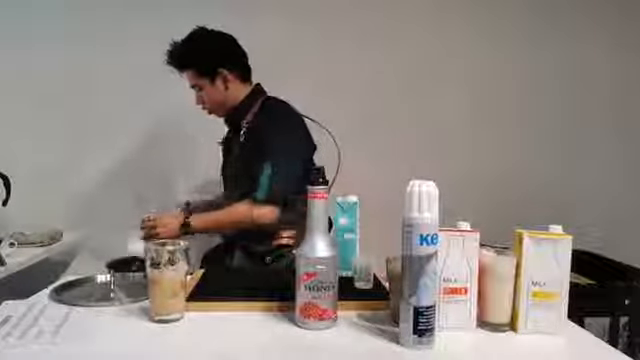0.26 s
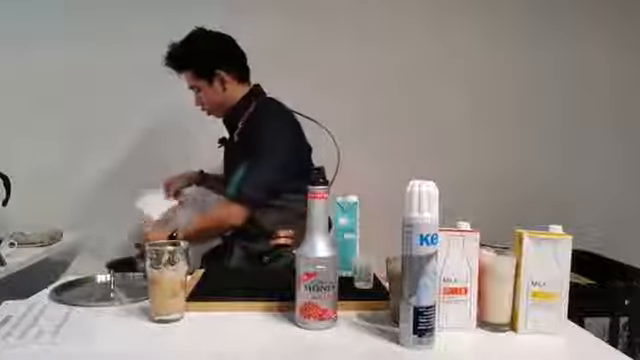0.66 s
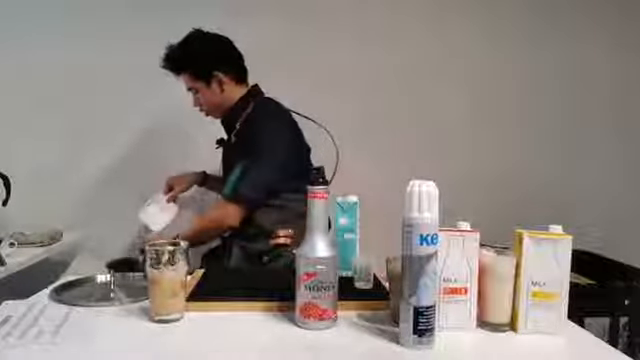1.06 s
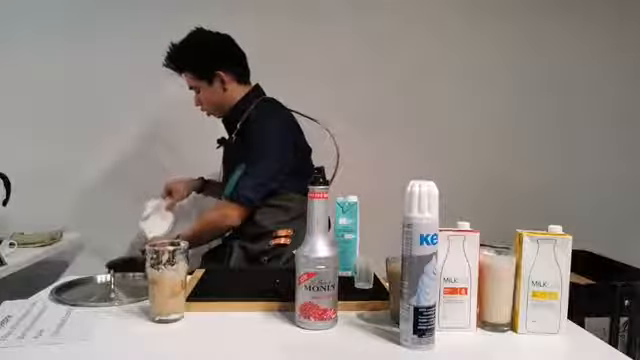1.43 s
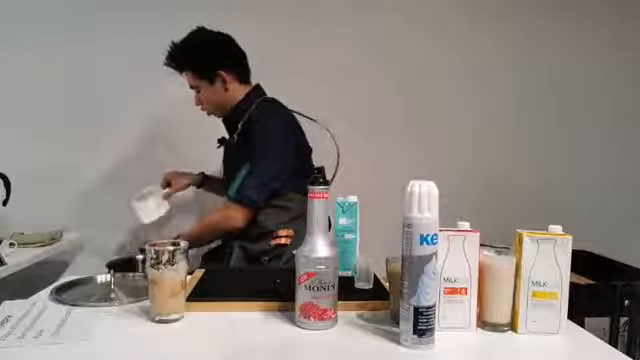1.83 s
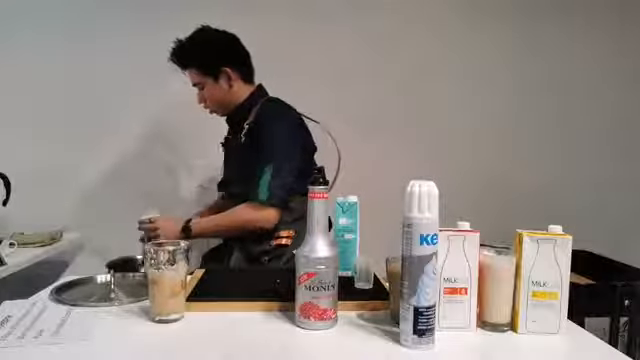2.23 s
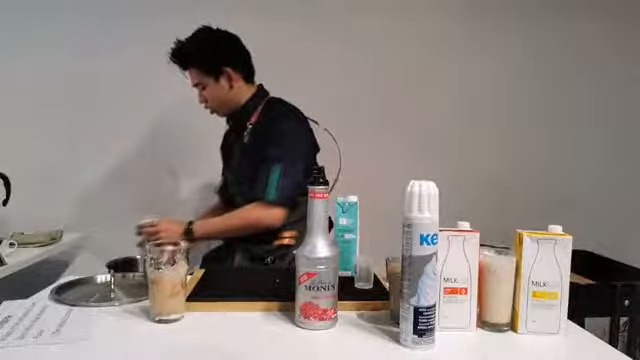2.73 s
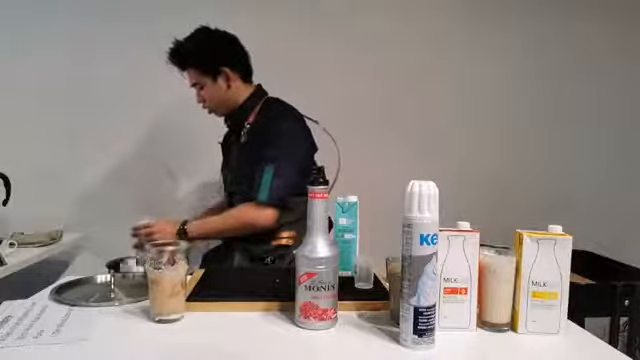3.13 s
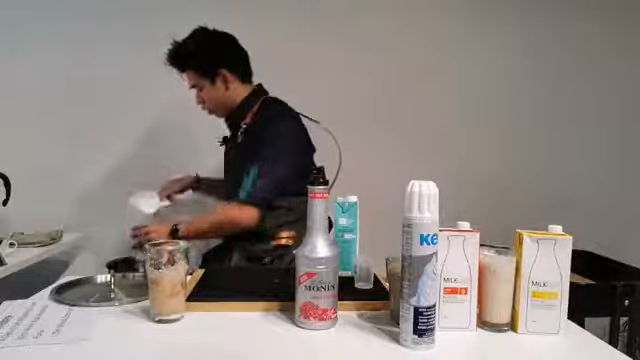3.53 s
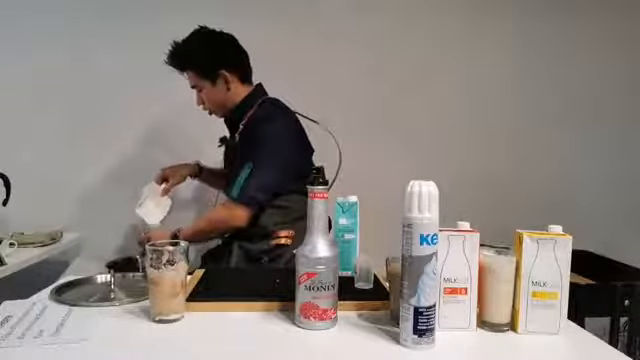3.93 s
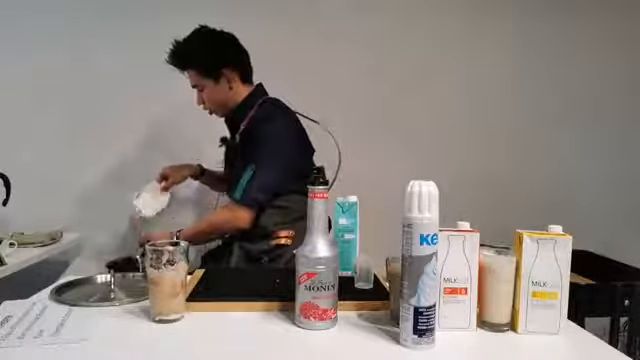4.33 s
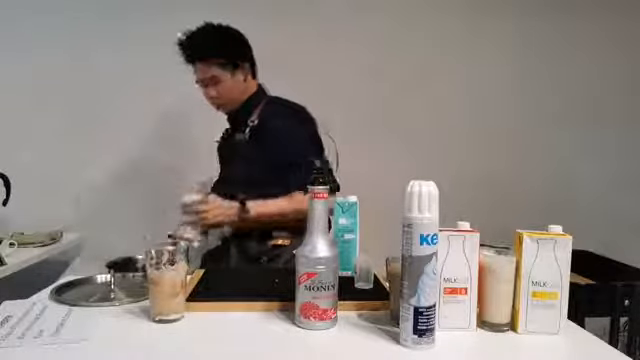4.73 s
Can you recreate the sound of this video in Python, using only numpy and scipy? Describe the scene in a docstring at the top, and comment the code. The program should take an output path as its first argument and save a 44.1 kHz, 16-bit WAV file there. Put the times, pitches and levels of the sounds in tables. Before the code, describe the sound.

A scoop digs twice through ice in a ringing metal container, each time dropping a few cubes into a glass with light clinks.

```python
"""Ice cubes grind and knock as a scoop digs them out of a metal bin, which rings.
Each knock is a crack, a hollow tone and a short bright clink. Cubes tipped into a glass
ring its wall, and metal struck free of the ice rings on. A bare room answers over a low
rumble, a wavering hum, one faint groan and a thin hiss."""
import sys
import numpy as np
from scipy import signal
from scipy.fft import rfft, irfft
from scipy.io import wavfile
from scipy.ndimage import uniform_filter1d

SR = 44100
rng = np.random.default_rng(int(sys.argv[2]) if len(sys.argv) > 2 else 0)


def store_pcm(level_fs):
    """Save levels as 16-bit WAV."""
    pcm = np.round(np.clip(level_fs, -1, 1) * 32767).astype(np.int16)
    wavfile.write(sys.argv[1], SR, np.atleast_2d(pcm).T)


N = 219390


def undb(db):
    return 10 ** (np.asarray(db) / 20)


def unit_rms(x):
    return x / np.sqrt(np.mean(x ** 2))


def band(x, lo_hz, hi_hz):
    return signal.sosfilt(signal.butter(3, [lo_hz, hi_hz], "bandpass", fs=SR, output="sos"), x)


def sine(hz, t):
    return np.sin(2 * np.pi * hz * t)


def mode(x, hz, t60_s):
    """One damped resonance; a unit impulse rings at size 1."""
    pole = np.exp(2j * np.pi * hz / SR - np.log(1000) / (t60_s * SR))
    return signal.lfilter([1], [1, -pole], x).imag


def colour(x, points, size=4096):
    """Minimum-phase filter through (Hz, dB) points."""
    hz, db = np.transpose(points)
    log_hz = np.log(np.fft.rfftfreq(size, 1 / SR) + 1)
    cepstrum = irfft(np.log(undb(np.interp(log_hz, np.log(hz), db))))
    cepstrum[1:size // 2] *= 2
    cepstrum[size // 2 + 1:] = 0
    return signal.fftconvolve(x, irfft(np.exp(rfft(cepstrum))))[:len(x)]


def envelope(points):
    """Gain through (s, dB) points, silent outside them."""
    times_s, db = np.transpose(points)
    return undb(np.interp(np.arange(N) / SR, times_s, db, left=-200, right=-200))


def wander(rate_hz):
    """Smooth random drift, spread near 1."""
    hold = int(SR / rate_hz)
    steps = np.repeat(rng.standard_normal(N // hold + 1), hold)
    return 1.3 * uniform_filter1d(uniform_filter1d(steps, hold), hold)[:N]


def spell(start_s, hold_s, attack_s=0.0058, settle_db_per_s=265):
    """Gain of one grinding spell: it swells, holds, and the cubes settle."""
    t = np.maximum(np.arange(N) / SR - start_s, 0)
    return (1 - np.exp(-t / attack_s)) * undb(-settle_db_per_s * np.maximum(t - hold_s, 0))


def tinkle(count=7000, lo_hz=600, hi_hz=9000, t60_s=0.026):
    """Small contacts each ring a cube at its own pitch."""
    when, pitch, size = rng.random((count, 3)).T[:, :, None]
    age = np.arange(SR // 60)
    pings = size * undb(-60 * age / SR / t60_s) * sine(lo_hz * (hi_hz / lo_hz) ** pitch, age / SR)
    at = (when * N).astype(int) + age
    return unit_rms(np.bincount(at.ravel(), pings.ravel(), N)[:N])


# Each row: start in seconds, hold in seconds, level in dB, extra treble in dB; band gains add to these.
GRIND_SPELLS = [(-.05, .12, -31.5, 1.5), (.1, 0.06, -46, -2), (0.329, 0.24, -52.5, 5.5),
                (0.678, 0.069, -52.5, -1), (0.764, 0.015, -33, -15), (0.913, 0.017, -35, -8.5),
                (0.998, 0.08, -70, 24), (1.379, 0.09, -31, -15.5), (1.589, 0.032, -23.5, -8),
                (1.661, 0.14, -40.5, -17.5), (1.82, 0.2, -46, -26), (2.056, 0.093, -46, -18.5),
                (2.248, 0.22, -29, 1.5), (2.471, 0.11, -32, -0.5), (2.608, 0.17, -30.5, 0),
                (2.802, 0.097, -33, -6), (2.981, 0.11, -60, 20), (3.141, 0.1, -47.5, 0),
                (3.329, 0.096, -42, 7), (3.948, 0.074, -57.5, 8.5), (4.707, 0.13, -37.5, -2),
                (4.808, 0.064, -34, -4.5), (4.879, 0.11, -35, -10.5)]


def grinding(clicks_per_s=3000, spread_db=4.5, grain_s=0.0012, bass_db=6, mid_db=3, treble_db=5):
    """Tumbling cubes make clusters of small uneven contacts."""
    clusters = undb(1.5 * wander(30))
    hits = rng.random(N) < clicks_per_s / SR
    clicks = hits * undb(spread_db * np.minimum(rng.exponential(size=N), 3))
    puffs = signal.lfilter([1], [1, -np.exp(-1 / (grain_s * SR))], clicks)
    grains = clusters * (undb(-3) * tinkle() + unit_rms(puffs * rng.standard_normal(N)))
    bass = treble = 0
    for start_s, hold_s, db, extra_db in GRIND_SPELLS:
        gain = undb(db) * spell(start_s, hold_s)
        bass += undb(bass_db) * gain
        treble += undb(treble_db + extra_db) * gain
    mid = np.sqrt(bass * treble) * undb(mid_db)
    return (band(bass * grains, 200, 1500) + band(mid * grains, 1500, 3300)
            + band(treble * grains, 3300, 17000))


# Each row: frequency in Hz, relative noise density in dB.
RUMBLE_SPECTRUM = [(18, 6), (28, 4.5), (45, -21), (72, -11), (100, -6), (180, -1.5), (260, -19), (400, -28)]
# Each row: time in seconds, level in dB.
RUMBLE_LEVELS = [(0, -73.5), (2.9, -69), (3.5, -72), (3.65, -64.5), (4.6, -63.5), (4.68, -72), (4.97, -73)]


def rumble_and_hum(hum_hz=100.6, hum_rel_db=-2.5):
    """Low drifting noise and a hum that wavers in pitch and level."""
    noise = colour(rng.standard_normal(N), RUMBLE_SPECTRUM, size=16384)
    rumble = unit_rms(band(noise, 8.6, 500)) * undb(2 * wander(3.4))
    phase = 2 * np.pi * np.cumsum(hum_hz * (1 + 0.05 * wander(15))) / SR
    hum = undb(hum_rel_db + 2 * wander(14)) * np.sin(phase)
    return (rumble + hum) * envelope(RUMBLE_LEVELS)


# Each row: start in seconds, hollow tone in dB and Hz, bright tone in relative dB and Hz.
CUBE_KNOCKS = [(0.016, -29.5, 930, 7.5, 2840), (0.065, -19, 1217, -14, 2340),
               (0.325, -61, 1220, 25.5, 2300), (0.38, -41.5, 956, 10, 3330), (0.399, -34, 944, 3, 2510),
               (0.427, -32.5, 977, -2, 2310), (0.449, -33.5, 938, 7, 5060), (0.478, -39, 945, 7, 2395),
               (0.504, -41, 950, 11.5, 2446), (0.566, -50, 910, 17.5, 2010), (0.603, -37.5, 1442, 1, 1600),
               (0.677, -33, 1310, 2.5, 2310), (0.763, -22, 648, -5, 2490), (0.841, -32.5, 1200, -12, 3950),
               (0.877, -51.5, 800, 12, 4340), (0.9, -30.5, 646, -8, 2210), (0.924, -30, 652, -1.5, 2620),
               (1.031, -39.5, 602, 2.5, 4730), (1.382, -24.5, 582, -3.5, 2510), (1.41, -15, 806, -7, 1880),
               (1.564, -15.5, 568.5, -2.5, 1370), (1.589, -14.5, 1327, -8.5, 2280),
               (1.626, -20, 605, 0, 2588), (2.235, -22.5, 904, -4.5, 2670), (2.268, -21.5, 644, 2.5, 2520),
               (2.279, -19, 719, 1, 2364), (2.321, -8.5, 941, -29.5, 2550),
               (2.354, -16.5, 1270, -17.5, 1970), (2.455, -21, 675, -15, 2290),
               (2.612, -12.5, 714, -17, 2470), (2.622, -13, 742, -9.5, 2400),
               (2.673, -19.5, 622, -18, 2430), (2.7, -25.5, 626, -19, 2370), (2.725, -19.5, 600, 2, 2473),
               (2.761, -18.5, 634, -13, 2380), (2.859, -32, 1248, 9, 3780), (2.979, -37.5, 1280, 6.5, 4320),
               (3.012, -49, 950, 22.5, 4670), (3.143, -35.5, 591, -8, 2380), (3.17, -34.5, 628, -2, 2250),
               (3.205, -26.5, 1005, -2.5, 2566), (3.311, -34, 986, -1, 2420),
               (3.332, -10.5, 1018, -3.5, 2610), (3.355, -24.5, 1070, 5.5, 3980),
               (3.401, -35.5, 970, 8, 3900), (3.758, -24.5, 631, -11.5, 1895), (3.858, -44, 1310, 3, 2440),
               (4.042, -63.5, 1060, 23, 2177), (4.7, -14.5, 1244, 7.5, 2441), (4.809, -27.5, 1050, 6, 2356),
               (4.824, -17, 722, -9, 1520)]
# Multiples of the bright pitch.
CUBE_OVERTONES = [1.41, 1.7, 2]


def knocks(rise_s=0.0029, crack_s=0.009, tick_s=0.00069, hollow_t60_cycles=43, bright_t60_s=0.042):
    """Cubes strike the bin: a crack, a hollow tone and a bright clink with overtones."""
    cracks, hollows, clinks = np.zeros((3, N + SR))
    t = np.arange(SR // 3) / SR
    onset = 1 - np.exp(-t / rise_s)
    for start_s, db, hollow_hz, bright_db, bright_hz in CUBE_KNOCKS:
        cube_shape = rng.standard_normal(len(CUBE_OVERTONES))
        noise = rng.standard_normal(len(t))
        at = slice(int(start_s * SR), int(start_s * SR) + len(t))
        burst = onset * np.exp(-t / crack_s) * noise
        bright_burst = band(burst, bright_hz / 2, min(2.53 * bright_hz, 13000))
        cracks[at] += undb(db + 7) * (band(burst, 440, 1300) + undb(bright_db - 3.5) * bright_burst)
        # Edges meet with a tick that grows less than the knock.
        tick = band(np.exp(-t / tick_s) * noise, 4300, 15000)
        cracks[at] += undb(-27 + 0.067 * (db + bright_db)) * tick
        hollow = sine(hollow_hz, t) + 0.26 * sine(0.9 * hollow_hz, t)
        hollows[at] += onset * undb(db - 60 * t * hollow_hz / hollow_t60_cycles) * hollow
        overtones_hz = bright_hz * np.array(CUBE_OVERTONES) * (1 + 0.0276 * cube_shape)
        bright = sine(bright_hz, t) + undb(-11) * sum(sine(hz, t) for hz in overtones_hz if hz < 6500)
        chatter = 1 + 0.36 * unit_rms(uniform_filter1d(noise, size=120))
        clinks[at] += onset * undb(db + bright_db - 60 * t / bright_t60_s) * bright * chatter
    return cracks[:N], band(hollows[:N], 250, 6300), clinks[:N]


# Each row: frequency in Hz, gain of the direct contact sound in dB.
ICE_COLOUR = [(200, -37.5), (400, -10), (560, -1.5), (1200, -6), (1660, -14.5), (2500, -6.5), (5600, -11),
              (7000, -19), (10000, -33), (13500, -41), (15700, -54)]
# Each row: frequency in Hz, relative gain in dB, t60 in seconds.
BIN_MODES = [(532, -8, 0.041), (640, -9.5, 0.073), (722, -17.5, 0.049), (887, -37, 0.13),
             (1027, -17.5, 0.14), (1327, -10, 0.083), (1860, -37.5, 0.45), (2320, 0.5, 0.012),
             (2504, 2.5, 0.014), (5220, -20.5, 0.04)]


def ice_in_bin(contacts, hollows, ring_db=-38):
    """Contacts sound directly and through the modes of the metal bin."""
    drive = contacts + band(hollows, 150, 1300)
    shell = sum(undb(db + ring_db) * mode(drive, hz, t60_s) for hz, db, t60_s in BIN_MODES)
    return colour(contacts, ICE_COLOUR) + shell


# Each row: frequency in Hz, t60 in seconds at t60_scale 1.
ROOM_DECAY = [(250, 0.17), (600, 0.73), (1200, 2.06), (2100, 1.58), (5500, 1.25), (12000, 0.44)]


def room(dry, t60_scale=1, build_s=0.0037, wet_db=-11):
    """Dense echoes that last longest in the midrange."""
    t, tail = np.arange(SR) / SR, 0
    hz, t60_s = np.transpose(ROOM_DECAY)
    for centre_hz in 177 * 2. ** np.arange(7):
        decay_s = t60_scale * np.interp(np.log(centre_hz), np.log(hz), t60_s)
        octave = band(rng.standard_normal(SR), centre_hz / 2 ** .5, centre_hz * 2 ** .5)
        tail += octave * undb(-60 * t / decay_s)
    tail *= 1 - np.exp(-t / build_s)
    return signal.fftconvolve(dry, tail / np.sqrt(np.sum(tail ** 2)))[:N] * undb(wet_db)


# Each row: start in seconds, level in dB, extra dB of the second mode (set by the strike point).
GLASS_TAPS = [(1.081, -41, -8), (1.089, -36.5, 1), (1.104, -57, -6), (1.121, -48, -18), (1.1553, -32, -16),
              (1.2229, -55, 2), (4.04, -43.5, -16), (4.0725, -37.5, 6), (4.1047, -63, 11)]
# Each row: frequency in Hz, relative level in dB, t60 in seconds.
GLASS_MODES = [(3810, 2, 0.029), (4520, -3, 0.056), (4690, -4, 0.022), (6930, -4, 0.028)]


def glass_taps(rise_s=0.0014, tick_s=0.0047):
    """Light taps ring the glass wall, slightly off pitch as cubes lean on it."""
    taps, t = np.zeros(N + SR), np.arange(SR // 8) / SR
    hz, mode_db, t60_s = np.transpose(GLASS_MODES)[:, :, None]
    onset = 1 - np.exp(-t / rise_s)
    for start_s, db, second_db in GLASS_TAPS:
        detune = 1 + 0.017 * rng.standard_normal(hz.shape)
        noise = rng.standard_normal(len(t))
        wall = undb(mode_db - 60 * t / t60_s) * sine(hz * detune, t)
        wall[1] *= undb(second_db)
        chatter = 1 + 0.42 * unit_rms(uniform_filter1d(noise, size=150))
        tick = undb(-6) * np.exp(-t / tick_s) * noise
        at = int(start_s * SR)
        taps[at:at + len(t)] += undb(db) * onset * (wall.sum(axis=0) * chatter + tick)
    return band(taps[:N], 3000, 9700)


# Each row: start in seconds, frequency in Hz, level in dB, t60 in seconds.
METAL_PEALS = [(1.627, 5324, -52, 0.78), (2.828, 971, -39, 0.66), (3.334, 1015, -27.5, 0.96),
               (3.335, 1790, -42.5, 0.52), (3.336, 625.4, -39, 0.38), (3.757, 1301, -38, 0.3)]


def metal_peals(waver_depth=0.9, waver_cycles=24):
    """Struck metal rings on with an uneven, beating waver."""
    rings = 0
    for start_s, hz, db, t60_s in METAL_PEALS:
        t = np.maximum(np.arange(N) / SR - start_s, 0)
        waver = 1 + waver_depth * wander(hz / waver_cycles)
        rings += undb(db - 60 * t / t60_s) * waver * sine(hz, t)
    return band(rings, 500, 6500)


# Each row: time in seconds, level in dB.
SHAKE_LEVELS = [(2.24, -56.5), (2.718, -53), (2.96, -59)]


def floor_shake():
    """The scoop, deep in the ice, shakes the bin floor."""
    return unit_rms(mode(rng.standard_normal(N), hz=305, t60_s=0.093)) * envelope(SHAKE_LEVELS)


# Each row: time in seconds, level in dB.
GROAN_LEVELS = [(4.4, -71), (4.53, -56), (4.62, -84)]


def groan():
    """One faint low swell of resonant noise."""
    return unit_rms(mode(rng.standard_normal(N), hz=370, t60_s=0.033)) * envelope(GROAN_LEVELS)


def scene():
    """Ice, bin and glass in a bare room."""
    cracks, hollows, clinks = knocks()
    body = ice_in_bin(cracks + grinding(), hollows)
    # Small cubes radiate no deep bass.
    body, hollows = band(body, 340, 21000), band(hollows, 340, 21000)
    shake, taps = floor_shake(), glass_taps()
    body += metal_peals()
    direct = body + hollows + clinks + taps + shake
    # Clinks and taps get a shorter echo tail.
    short_echoes = room(undb(-6) * clinks + undb(2) * taps, t60_scale=0.55)
    echoes = room(body + undb(-2) * hollows)
    return (direct + short_echoes + echoes + rumble_and_hum() + groan())[None]


def suppress(x, memory_s=0.4, margin_db=-16, depth_db=-12):
    """Noise suppressor: turns down bands far below their recent mean power."""
    size, hop = 1024, 256
    spectra = signal.stft(x, nperseg=size, noverlap=size - hop)[2]
    power = uniform_filter1d(np.abs(spectra) ** 2, size=15, axis=0)
    power = uniform_filter1d(power, size=5, axis=1) + 1e-20
    pole = np.exp(-hop / (memory_s * SR))
    recent = signal.lfilter([1 - pole], [1, -pole], power, axis=1)
    gain = np.clip(1 - undb(2 * margin_db) * recent / power, undb(depth_db), 1)
    return signal.istft(spectra * gain, nperseg=size, noverlap=size - hop)[1][:N]


# Each row: frequency in Hz, relative noise density in dB.
HISS_SPECTRUM = [(150, 1), (300, 7.5), (1100, 2.5), (4000, -9), (6500, -18.5), (15000, -33.5)]


def record(dry, hiss_db=-69, top_hz=15720):
    """Suppress fading tails, add thin hiss, cut the top."""
    hiss = unit_rms(colour(rng.standard_normal(N), HISS_SPECTRUM)) * undb(hiss_db + 0.5 * wander(3.8))
    lowpass = signal.ellip(8, 0.2, 70, top_hz, fs=SR, output="sos")
    return signal.sosfilt(lowpass, suppress(dry[0]) + hiss)[None]


dry = scene()
out = record(dry)
store_pcm(out)
```